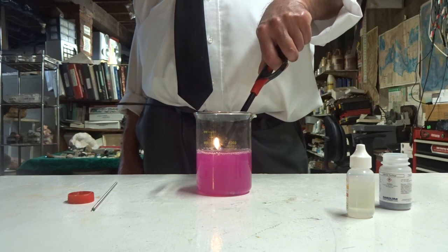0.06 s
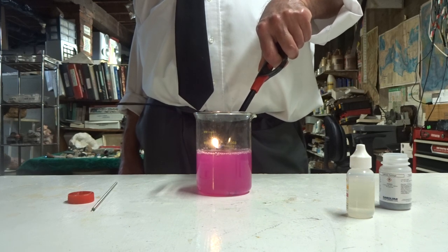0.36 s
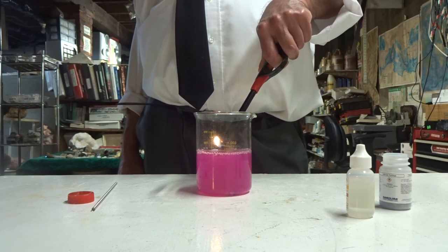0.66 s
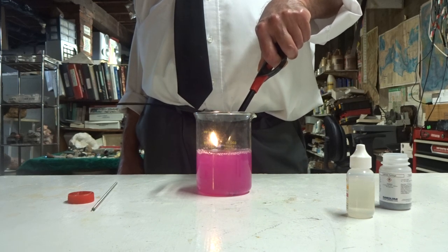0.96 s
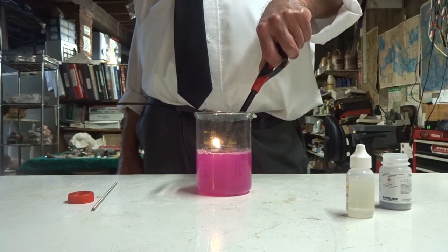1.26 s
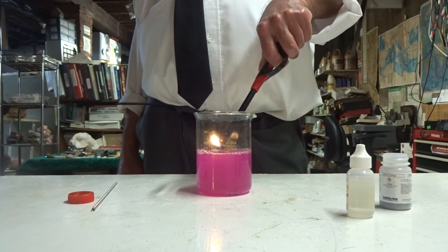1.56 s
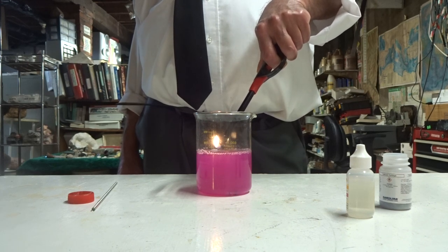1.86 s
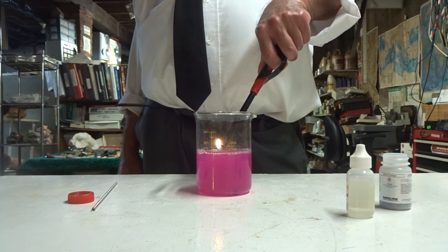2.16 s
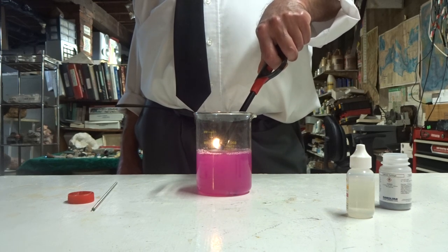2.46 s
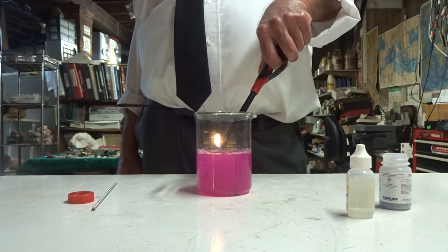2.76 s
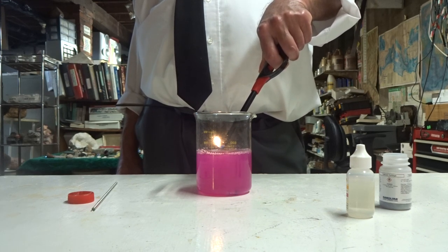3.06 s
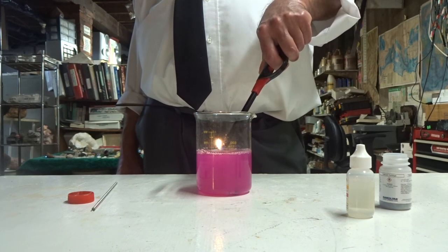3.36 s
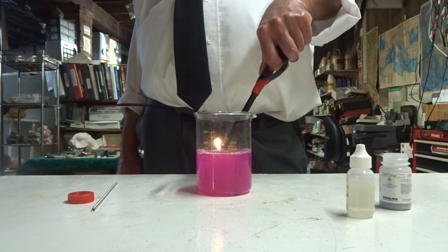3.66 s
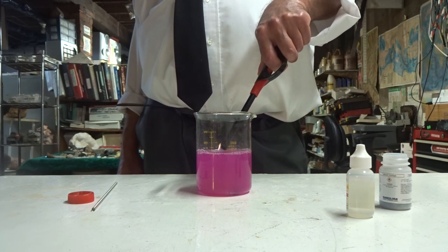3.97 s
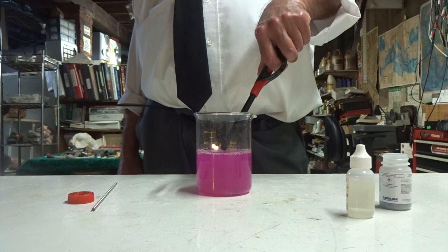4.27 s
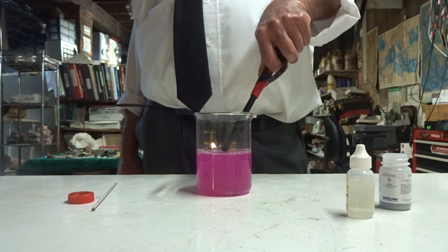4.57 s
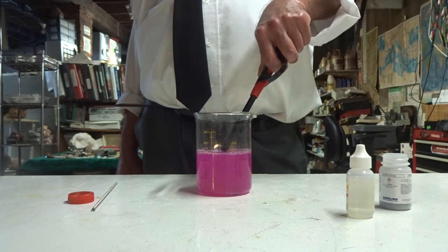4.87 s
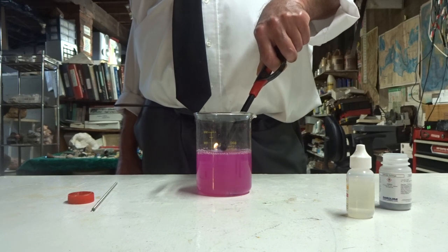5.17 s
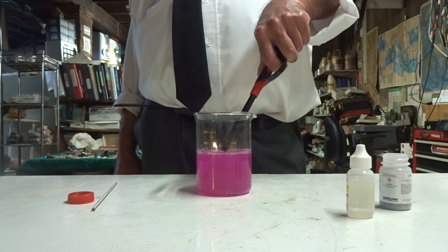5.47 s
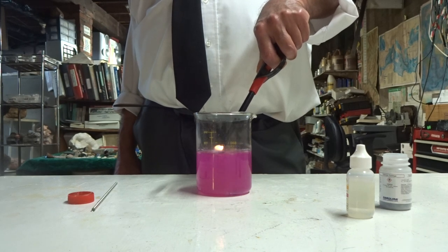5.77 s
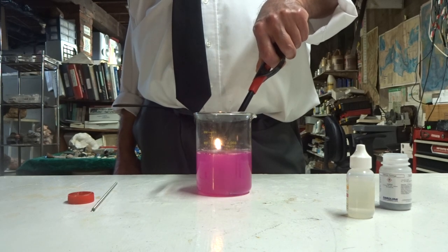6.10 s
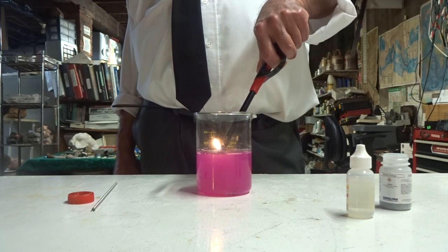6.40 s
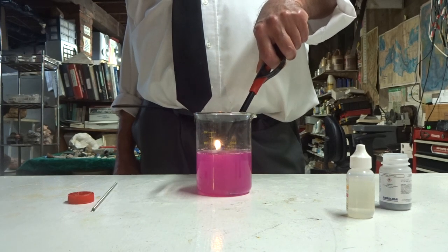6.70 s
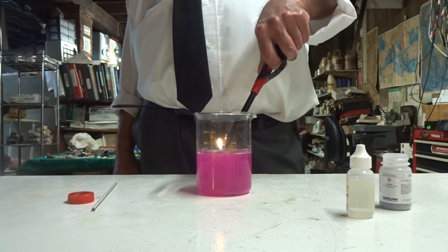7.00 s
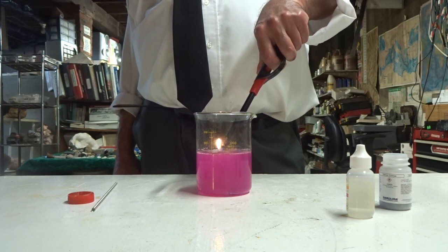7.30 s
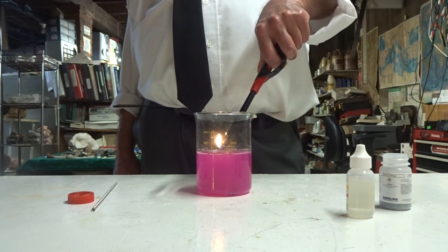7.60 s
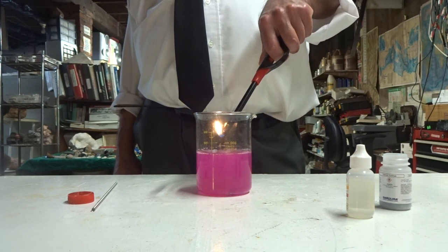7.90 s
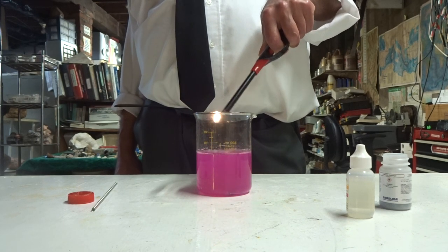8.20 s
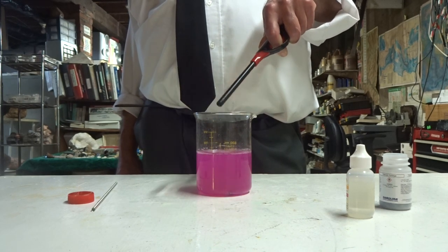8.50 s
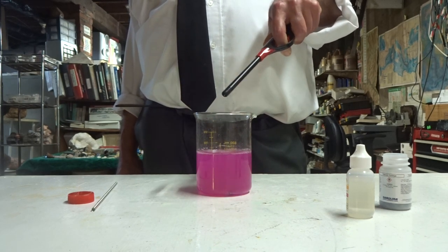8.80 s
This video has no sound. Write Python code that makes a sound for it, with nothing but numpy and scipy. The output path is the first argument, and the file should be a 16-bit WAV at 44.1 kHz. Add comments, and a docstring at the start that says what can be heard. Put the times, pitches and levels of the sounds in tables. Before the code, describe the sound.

In a quiet, slightly reverberant workshop, a reacting metal gives off a faint, prickly fizz directly in front of the microphone. A lighter clinks against the glass beaker, and later taps it again more softly. Rapid, uneven pops of burning gas follow for about two seconds, the loudest cluster carrying a brief boom. Three late pops and a faint flame flutter lead to the plastic snap of the released trigger.

```python
"""Pockets of hydrogen ignite and pop in a beaker, exciting the quarter-wave resonance of its air column;
now and then a larger pocket flares up with a boom. The gas comes from a bead of metal fizzing in water,
where tiny bubbles burst. A wand lighter held over the beaker flutters, whistles faintly and twice knocks
the glass into vibration; at the end its trigger snaps back. The bench and the workshop reflect it all."""
import sys
import numpy as np
from scipy import signal
from scipy.fft import rfft, irfft
from scipy.io import wavfile
from scipy.ndimage import uniform_filter1d

SR = 44100
rng = np.random.default_rng(int(sys.argv[2]) if len(sys.argv) > 2 else 0)


def output_pcm(signal):
    """Save a mono or channel-first signal as 16-bit PCM at the path in sys.argv[1].

    Samples are clipped to [-1, 1] before scaling.
    """
    pcm = np.clip(np.atleast_2d(signal).T, -1, 1) * 32767
    wavfile.write(sys.argv[1], SR, np.round(pcm).astype(np.int16))


N = 390285

# Hydrogen pops, alone or in runs. Each row: start in seconds, peak in dB, sizzle in dB, rasp in dB.
POPS = [(0.0055, -29, -55, -55.5), (3.7815, -25.5, -57, -54), (3.804, -19.5, -43, -56),
        (3.8156, -22, -52, -61), (3.821, -25.5, -49, -66), (3.8276, -17, -49, -45), (3.835, -20, -39, -57),
        (3.841, -25, -59.0, -61), (3.8478, -26, -56.5, -48), (3.8578, -26, -47, -61),
        (3.9965, -35.5, -50, -66), (4.0148, -25.5, -49, -59), (4.0519, -28.5, -45, -62),
        (4.0579, -26, -59.0, -53), (4.075, -29.5, -60, -55), (4.0816, -25, -48, -61),
        (4.1783, -31, -65, -68), (4.1903, -26, -62, -66), (4.353, -20.5, -59.0, -50),
        (4.466, -22.5, -58, -46.5), (4.5029, -19.5, -46, -50.5), (4.5565, -26.5, -59, -49.5),
        (4.585, -24.5, -57, -50), (4.6726, -26.5, -64, -63), (4.69, -25, -50, -62),
        (4.697, -26, -54.0, -50), (4.7147, -30, -60, -54), (4.723, -20.5, -49, -52),
        (4.7928, -31.5, -59.0, -55), (4.844, -20.5, -46, -45), (4.8625, -24.5, -47, -48),
        (4.893, -24.5, -52, -53), (4.939, -27.5, -46.5, -48.5), (4.946, -27, -59.0, -56.5),
        (5.072, -24.5, -59.0, -53), (5.1521, -27, -51, -55.5), (5.1694, -34, -67, -56),
        (5.185, -26.5, -52, -59.5), (5.2385, -24.5, -63, -55), (5.2885, -23, -48, -46),
        (5.2974, -28.5, -66, -62), (5.333, -22.5, -56, -52.5), (5.365, -22.5, -58, -49),
        (5.3994, -25.5, -63, -52), (5.408, -34, -64, -66), (5.418, -20.5, -55, -44),
        (5.485, -26.5, -54, -52.5), (5.5295, -29.5, -49.5, -59.5), (5.5675, -10.5, -36.5, -45.5),
        (5.5705, -5, -64, -42.5), (5.5777, -11, -58, -35.5), (5.5876, -9, -57, -56),
        (5.598, -11.5, -57, -40.5), (5.606, -16, -52, -71), (5.6161, -17, -48.0, -40),
        (5.622, -16, -37, -64.0), (5.6335, -12, -47, -39.0), (5.6363, -20.5, -45, -64.0),
        (5.649, -22, -54, -62), (5.724, -28, -59.0, -56), (5.737, -24, -59.0, -53),
        (5.744, -24, -53.0, -45), (5.7517, -31, -61, -55), (5.7632, -27, -57.0, -49),
        (5.7717, -17, -46, -48), (5.7839, -31, -59.0, -61.0), (5.7912, -31, -57, -57),
        (6.6239, -28, -62, -60), (6.6507, -21, -43.5, -52), (6.7117, -20, -43.5, -51)]
# Spectra of a puff of burning gas, its spray and its rasp. Each row: frequency in Hz, gain in dB.
PUFF_SPECTRUM = [(50, -45), (150, -7.5), (380, -4), (520, -2), (750, 2), (1150, -2), (1550, -7.5),
                 (2200, -13), (5000, -16), (15000, -22)]
SIZZLE_SPECTRUM = [(1500, -14.5), (4700, -25.5), (5400, 4), (6200, 2), (7000, -12), (15000, -19.5)]
RASP_SPECTRUM = [(1500, 0), (1900, -8.5), (2350, -9), (2850, -3), (3300, -7), (3700, -8.5), (4100, -8.5),
                 (4750, -13), (5300, -13.5), (15000, -23)]
# Air modes below and above the beaker's main one. Each row: frequency in Hz, gain in dB, t60 in seconds.
LOWER_AIR_MODES = [(734, -7.5, 0.013)]
UPPER_AIR_MODES = [(2840, -31, .007), (4396, -33.5, .009), (8900, -37, 0.0078)]

# Larger pockets burning. Each row: start in seconds, length in seconds, boom in dB,
# fall of the boom's drive in dB per second, thump relative to the boom in dB, rush in dB.
FLARES = [(3.816, 0.018, -35, 8, -14, -49), (5.566, 0.064, -20.5, 137, -5, -32.5),
          (5.735, 0.056, -52.5, 20, 7, -42.5), (6.705, 0.018, -48, 55, 2, -41)]
# Low resonances driven by a flare. Each row: frequency in Hz, relative level in dB, t60 in seconds.
BOOM_MODES = [(261, -1.5, 0.14), (330, -6, 0.076), (410, -18.5, 0.081)]
THUMP_MODES = [(160, -9, 0.141)]
# Rushing noise of a flare. Each row: frequency in Hz, gain in dB.
RUSH_SPECTRUM = [(500, -8), (750, 14.5), (1050, 21.5), (1250, 15), (1600, 6.5), (2200, -23), (2850, 3.5),
                 (3500, -5), (4700, -38), (6500, -15), (15000, -21)]
# Air resonances that howl in a flare. Each row: frequency in Hz, width in Hz, level against the rush in dB.
HOWL_BANDS = [(2820, 180, -13), (4720, 260, -17.5)]

# Larger single bubbles bursting. Each row: start in seconds, peak in dB, pitch in Hz.
BUBBLES = [(0.8478, -34, 5600), (0.9626, -40, 10900), (1.387, -42, 10400), (3.0011, -43, 13000),
           (5.012, -39, 10500), (7.028, -39, 14000), (7.823, -41, 13000)]
# Spectra of the tiny bubbles and of the finest ones. Each row: frequency in Hz, gain in dB.
FIZZ_SPECTRUM = [(300, -15), (700, -5), (950, -1), (1150, 8.5), (1380, 3.5), (1600, -11.5), (2450, -20),
                 (2850, -12.5), (3250, -34.5), (3900, -21), (4400, -9), (4900, -23), (15000, -14.5)]
PRICKLE_SPECTRUM = [(300, -25.5), (1900, -4), (2500, -11.5), (3500, -6), (4300, -4), (5900, -5),
                    (7000, -3.5), (9200, -4.5), (10800, 4.5), (11600, 0), (12600, 2), (15500, -2.5)]
# Spells of livelier bubbling. Each row: start in seconds, end in seconds, level in dB.
FIZZ_SPELLS = [(0, 2.3, -61), (4.2, 6.4, -62.5), (6.9, 7.32, -62.5), (8.68, 8.85, -66)]
PRICKLE_SPELLS = [(.85, 2.3, -65.5), (3, 5.6, -63.5), (6.1, 6.8, -69), (7.35, 8.85, -66.5)]

# The wand strikes the glass. Each row: start in seconds, peak of the ring in dB, tick relative to it in dB.
KNOCKS = [(0.554, -17.5, -9), (3.729, -27.5, -10.5)]
# Modes of the filled beaker on the bench. Each row: frequency in Hz, relative level in dB, t60 in seconds.
GLASS_MODES = [(236, 8, 0.046), (256.6, 2.5, 0.15), (429, 0, .06), (562, 7, 0.062), (703, 4.5, 0.048),
               (826, -6, 0.5), (836, -6, 0.44), (845, 2.5, 0.12), (913, 8, 0.17), (1147, 13.5, 0.037),
               (1754, -1, 0.038), (2094, -3.5, 0.067), (3542, -6, 0.092), (4500, -18, 0.05),
               (5370, -17, .04)]
# Hard contact on glass. Each row: frequency in Hz, gain in dB.
TICK_SPECTRUM = [(300, 5), (1900, 8), (2450, -20), (3200, -3.5), (3600, 4), (4300, -1.5), (5300, 1),
                 (6800, -13), (9000, -3.5), (11000, -2.5), (15000, 0.5)]

# Light ticks of the trigger's latch. Each row: start in seconds, base level in dB.
LATCH_CLICKS = [(8.0918, -40), (8.398, -46), (8.4167, -35.5), (8.436, -44), (8.466, -40), (8.552, -45),
                (8.8308, -37)]
# Spectra of the latch and of the plastic handle. Each row: frequency in Hz, gain in dB.
LATCH_SPECTRUM = [(100, -21), (700, -9), (1200, -2), (1550, -12), (1900, 1), (2300, -2), (3100, -8),
                  (3800, 8), (4400, 5), (5000, -4), (5700, 3), (6500, 0), (8300, -1), (10000, 3),
                  (15500, -1)]
HANDLE_SPECTRUM = [(50, -24), (250, -12), (700, -17), (1250, 5), (1600, -4), (2100, 8.5), (2850, -10),
                   (3900, 5), (4600, -4.5), (5400, 7.5), (6400, -3), (7700, 10.5), (9500, -2.5), (11400, 3),
                   (12600, -7), (15500, -2)]
# Modes of the hollow handle. Each row: frequency in Hz, relative level in dB, t60 in seconds.
HANDLE_MODES = [(1290, -27, 0.033), (1950, -20, 0.011), (2280, -18, 0.0091), (3800, -16, .008),
                (5000, -13, .008), (5700, -13, .008), (7450, -13, 0.0087), (8250, -10, .008)]
# Rumble of the lighter's flame. Each row: frequency in Hz, gain in dB.
FLUTTER_SPECTRUM = [(40, -15.5), (100, -13), (148, 7), (200, -14.5), (250, -5.5), (320, -6.5), (500, -29.5),
                    (1500, -31.5), (8000, -35)]
# Spells of a louder flame and a louder gas jet. Each row: start in seconds, end in seconds, level in dB.
FLAME_SPELLS = [(1.7, 1.9, -63.5), (5.3, 6.05, -55), (6.6, 7.1, -62.5), (7.25, 7.55, -50.5)]
JET_SPELLS = [(7.1, 7.7, -73), (7.75, 8.1, -68.5)]

# Early reflections from the bench and its surroundings. Each row: delay in seconds, gain in dB.
ECHOES = [(.00494, -19.5), (.0061, -13), (.0081, -13.5), (.01136, -17.5), (.01748, -14.5), (0.028, -19),
          (.03531, -26.5)]
# Reverberation. Each row: band centre in Hz, t60 in seconds, level in dB, side minus mid in dB.
REVERB_BANDS = [(139, 0.23, -17.5, -10), (373, 0.29, -5.5, -21), (990, 0.48, -18, 1.5),
                (2420, 0.26, -1.5, -7.5), (5960, 0.19, -8.5, -12.5), (14000, 0.15, -9, -12.5)]
# Background noise, and the further filter on its side channel. Each row: frequency in Hz, gain in dB.
BACKGROUND_SPECTRUM = [(15, -65), (25, -9), (157, -4), (194, -3), (361, -7.5), (437, -9), (710, -13.5),
                       (929, -13.5), (1180, -15), (1550, -18), (2500, -22.5), (5820, -22), (7030, -25.5),
                       (10800, -21), (15800, -28)]
BACKGROUND_SIDE = [(60, -15.5), (110, -6), (200, -4.5), (380, 3), (700, 7), (1290, 8), (2380, 2),
                   (4400, -3), (8120, -8.5), (15000, -17)]


def pops(cold_hz=1038, hz_per_heat=35, column_t60=0.019, pitch_scatter=0.021, damping_scatter=0.14):
    """Quarter-wave resonance: each puff rings the air column, higher in hot gas, with spray and rasp."""
    out, t = np.zeros(N), seconds(.12)
    for s, db, sizzle_db, rasp_db in ignitions():
        hz = (cold_hz + hz_per_heat * heat(s)) * (1 + pitch_scatter * rng.standard_normal())
        t60 = column_t60 * np.exp(damping_scatter * rng.standard_normal())
        tone = colour(ring([(hz, 0, t60)] + LOWER_AIR_MODES, t), PUFF_SPECTRUM)
        bench_echo = undb(-4) * delay(tone, 0.00095)  # about one cycle later
        add(out, s, undb(db) * peak(tone + bench_echo))
        sizzle = undb(sizzle_db) * crack(SIZZLE_SPECTRUM, decay_s=0.0014, tail_db=-20.5, tail_s=0.0053)
        burn = crack(RASP_SPECTRUM, decay_s=0.0033, tail_db=-11.5, tail_s=0.028)
        rasp = undb(rasp_db) * beaker_air(burn)
        overhead_echo = undb(-5.5) * delay(rasp, .0081)  # the beaker's mouth beams the rasp upward
        add(out, s + 0.0006, sizzle + rasp + overhead_echo)
    return out


def ignitions(after_chance=0.13, after_s=0.01, after_db=-10):
    """Chain ignition: the listed pops, plus the weaker ones that some set off just after them."""
    rows = list(POPS)
    for (s, *levels), (draw, wait) in zip(POPS, rng.random((len(POPS), 2))):
        if draw < after_chance:
            rows.append((s + after_s * (.5 + wait), *(db + after_db for db in levels)))
    return rows


def heat(s, per_pop=0.025, cooling_s=0.39):
    """Exponential cooling: the heat that earlier pops have left in the gas at time s, 0 when cold."""
    return per_pop * sum(np.exp(-(s - earlier) / cooling_s) for earlier, *_ in POPS if earlier < s)


def beaker_air(x):
    """Cavity resonance: a sound made inside the beaker also rings its upper air modes."""
    response = 2 * np.gradient(ring(UPPER_AIR_MODES, seconds(.04)))
    return x + signal.fftconvolve(x, response)[:len(x)]


def flares(release_s=0.0056, kick=0.79, howl_flat=0.22, glide_s=0.0074, swell_s=0.00323, sputter_db=4):
    """Forced resonance: a flame front runs through a larger pocket, which booms, rushes and howls."""
    out, t = np.zeros(N), seconds(.4)
    for s, length, boom_db, fall_db_per_s, thump_db, rush_db in FLARES:
        burning = np.exp(-np.maximum(t - length, 0) / release_s)
        drive = rng.standard_normal(len(t)) * burning * undb(-fall_db_per_s * t)
        drive[0] += kick * np.linalg.norm(drive)  # the first push of air
        for modes, level_db in ((BOOM_MODES, boom_db), (THUMP_MODES, boom_db + thump_db)):
            for hz, db, t60 in modes:
                boom = signal.fftconvolve(drive, ring([(hz, 0, t60)], t))[:len(t)]
                loudest_rms = np.sqrt(uniform_filter1d(boom ** 2, size=1400).max())
                add(out, s, undb(level_db + db) * boom / loudest_rms)
        rush = unit(colour(rng.standard_normal(len(t)), RUSH_SPECTRUM))
        glide = 1 - howl_flat * np.exp(-t / glide_s)  # the pitch rises as the gas heats
        howl = sum(undb(db) * resonance(hz * glide, width) for hz, width, db in HOWL_BANDS)
        howl *= 1 - np.exp(-t / swell_s)
        sputter = unit(undb(sputter_db * walk(260)[:len(t)]))
        add(out, s, undb(rush_db) * burning * sputter * (rush + howl))
    return out


def fizz(bubble_t60=0.0016, bubble_rise_s=0.00017):
    """Impulse excitation: tiny bubbles burst and ring the beaker; a few larger ones tick on their own."""
    bursts = unit(colour(grains(per_s=3000, spread_db=6.0), FIZZ_SPECTRUM))
    out = bursts * spells(FIZZ_SPELLS, idle_db=-75.5, attack_s=0.14, release_s=0.16)
    t = seconds(.02)
    onset = 1 - np.exp(-t / bubble_rise_s)
    for s, db, hz in BUBBLES:
        add(out, s, undb(db) * peak(ring([(hz, 0, bubble_t60)], t) * onset))
    return out


def prickle(surge_db=1.0, bench_s=60 / SR, bench_db=-10):
    """Comb filtering: the hiss of the finest bubbles meets its reflection off the bench and turns hollow."""
    clicks = colour(grains(per_s=9000, spread_db=4.0), PRICKLE_SPECTRUM)
    bursts = beaker_air(clicks) * undb(surge_db * walk(10))
    hollow = bursts + undb(bench_db) * delay(bursts, bench_s)
    return unit(hollow) * spells(PRICKLE_SPELLS, idle_db=-64, attack_s=0.16, release_s=0.18)


def knocks(lag_cycles=1.075):
    """Free vibration: metal ticks on glass, then beaker and bench ring, the low modes starting last."""
    out, t = np.zeros(N), seconds(.6)
    for s, db, tick_db in KNOCKS:
        body = sum(delay(ring([(hz, gain_db, t60)], t), lag_cycles / hz)
                   for hz, gain_db, t60 in GLASS_MODES)
        tick = crack(TICK_SPECTRUM, decay_s=0.0022, tail_db=-3.5, tail_s=0.0036)
        add(out, s, undb(db) * peak(body))
        add(out, s, undb(db + tick_db) * tick)
    return out


def trigger(contact_db=6, chatter_db=-2, snap_at_s=8.485, snap_db=-20.5):
    """Impact noise: the latch ticks, and the released trigger hits its stop and rings the handle."""
    out = np.zeros(N)
    contact = peak(colour(signal.unit_impulse(512), LATCH_SPECTRUM))
    for s, db in LATCH_CLICKS:
        chatter = crack(LATCH_SPECTRUM, decay_s=0.0019, tail_db=-22.0, tail_s=0.014)
        add(out, s, undb(db + contact_db) * contact)
        add(out, s, undb(db + chatter_db) * chatter)
    snap = crack(HANDLE_SPECTRUM, decay_s=0.0017, tail_db=-26, tail_s=0.014)
    handle = ring(HANDLE_MODES, np.arange(len(snap)) / SR)
    add(out, snap_at_s, undb(snap_db) * (snap + handle))
    return out


def lighter(rough_db=0.5, nozzle_hz=5820, drift_hz=35, waver_db=2.5, gas_off_s=8.38, fade_s=0.068):
    """Flow noise: the flame flutters and the gas jet whistles in its nozzle until the valve shuts."""
    rumble = colour(rng.standard_normal(N), FLUTTER_SPECTRUM)
    flutter = unit(rumble * undb(rough_db * walk(45)))
    nozzle = resonance(nozzle_hz + drift_hz * walk(2.7), width_hz=230)
    whistle = unit(nozzle * undb(waver_db * walk(12)))
    flame = flutter * spells(FLAME_SPELLS, idle_db=-66, attack_s=0.082, release_s=0.18)
    jet = whistle * spells(JET_SPELLS, idle_db=-75, attack_s=0.2, release_s=0.17)
    valve = np.exp(-np.maximum(np.arange(N) / SR - gas_off_s, 0) / fade_s)
    return valve * (flame + jet)


def workshop(x, onset_s=.01, rise_s=0.0013):
    """Reverberation: a few near reflections and a short diffuse tail, longest and widest near 1 kHz."""
    t = seconds(.8)
    log_hz = np.log(np.maximum(np.fft.rfftfreq(len(t), 1 / SR), 1))
    centres = np.log([hz for hz, *_ in REVERB_BANDS])
    tail = 0
    for share, (_, t60, db, side_db) in zip(np.eye(len(REVERB_BANDS)), REVERB_BANDS):
        fade = np.exp(-np.log(1000) * t / t60) * np.clip((t - onset_s) / rise_s, 0, 1)
        band = np.sqrt(np.interp(log_hz, centres, share))
        mid, side = irfft(rfft(rng.standard_normal((2, len(t)))) * band, len(t))
        tail = tail + undb(db) * stereo(mid, undb(side_db) * side) * fade / np.linalg.norm(fade)
    early = sum(undb(db) * delay(x, s) for s, db in ECHOES)
    return x + early + signal.fftconvolve(x[None], tail, axes=1)[:, :N]


def room_tone(mid_db=-57):
    """Stationary noise: the workshop's low background under an even hiss."""
    mid, side = (unit(colour(rng.standard_normal(N), BACKGROUND_SPECTRUM)) for _ in range(2))
    return undb(mid_db) * stereo(mid, colour(side, BACKGROUND_SIDE))


def ring(modes, t):
    """Damped oscillation: a sum of modes, each falling 60 dB in its t60."""
    return sum(undb(db) * np.sin(2 * np.pi * hz * t) * np.exp(-np.log(1000) * t / t60)
               for hz, db, t60 in modes)


def crack(spectrum, decay_s, tail_db, tail_s):
    """Source and filter: a sharp noise burst with a weaker tail, coloured without changing its energy."""
    t = seconds(.15)
    envelope = np.exp(-t / decay_s) + undb(tail_db) * np.exp(-t / tail_s)
    burst = colour(rng.choice([-1, 1], len(t)) * envelope, spectrum)
    return burst * np.linalg.norm(envelope) / np.linalg.norm(burst)


def resonance(hz, width_hz):
    """Quadrature modulation: narrow-band noise of rms 1 around a moving centre hz."""
    pole = np.exp(-np.pi * width_hz / SR)
    a, b = signal.lfilter([1], [1, -2 * pole, pole ** 2], rng.standard_normal((2, len(hz))))
    phase = 2 * np.pi * np.cumsum(hz) / SR
    return unit(a * np.cos(phase) + b * np.sin(phase))


def grains(per_s, spread_db):
    """Shot noise: tiny clicks at random times, a few much larger than the rest."""
    sizes = rng.standard_normal(N) * undb(spread_db * np.minimum(rng.exponential(size=N), 4))
    return (rng.random(N) < per_s / SR) * sizes


def spells(rows, idle_db, attack_s, release_s):
    """Addition of powers: the gain of a steady level plus spells that rise, hold and die away."""
    t = np.arange(N) / SR
    power = undb(idle_db) ** 2
    for start, end, db in rows:
        envelope = np.exp(-np.maximum(start - t, 0) / attack_s - np.maximum(t - end, 0) / release_s)
        power = power + (undb(db) * envelope) ** 2
    return np.sqrt(power)


def walk(per_s):
    """Random modulation: values held for 1 / per_s seconds, smoothed twice and scaled to rms 1."""
    hold = int(SR / per_s)
    held = np.repeat(rng.standard_normal(N // hold + 1), hold)
    return unit(uniform_filter1d(uniform_filter1d(held, hold), hold)[:N])


def radiate(x, cut_hz):
    """Radiation efficiency: a small vessel gives off little deep bass."""
    return signal.sosfilt(signal.butter(6, cut_hz, "high", fs=SR, output="sos"), x)


def colour(x, spectrum, size=4096):
    """Minimum-phase filtering: folding the cepstrum gives a causal filter with this spectrum."""
    hz, db = np.transpose(spectrum)
    bin_hz = np.maximum(np.fft.rfftfreq(size, 1 / SR), 1)
    gain = undb(np.interp(np.log(bin_hz), np.log(hz), db))
    cepstrum = irfft(np.log(gain))
    cepstrum[1:size // 2] *= 2
    cepstrum[size // 2 + 1:] = 0
    return signal.fftconvolve(x, irfft(np.exp(rfft(cepstrum))))[:len(x)]


def delay(x, s):
    """Time delay: the same sound s seconds later."""
    i = np.arange(len(x))
    return np.interp(i - s * SR, i, x, left=0)


def add(out, s, x):
    """Superposition: mix x into out from time s."""
    i = max(int(round(s * SR)), 0)
    out[i:i + len(x)] += x[:max(N - i, 0)]


def stereo(mid, side):
    """Sum and difference: left and right from mid and side."""
    return np.array([mid + side, mid - side])


def undb(db):
    """Decibels to amplitude ratio."""
    return 10 ** (np.asarray(db) / 20)


def unit(x):
    """Normalisation to rms 1."""
    return x / np.sqrt(np.mean(x ** 2))


def peak(x):
    """Normalisation to peak 1."""
    return x / np.abs(x).max()


def seconds(length):
    """Uniform sampling: a time axis in seconds."""
    return np.arange(int(length * SR)) / SR


def scene():
    """Superposition: beaker and lighter sound straight ahead in the reverberant workshop."""
    beaker = pops() + radiate(flares(), cut_hz=118) + fizz() + prickle() + radiate(knocks(), cut_hz=130)
    return workshop(beaker + trigger() + lighter()) + room_tone()


def record(dry, top_hz=15900):
    """Band limiting: a steep low-pass removes the highest treble."""
    return signal.sosfilt(signal.ellip(10, .1, 70, top_hz, fs=SR, output="sos"), dry)


dry = scene()
out = record(dry)
output_pcm(out)
```